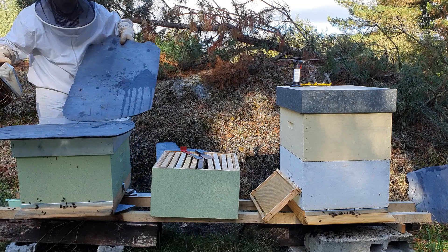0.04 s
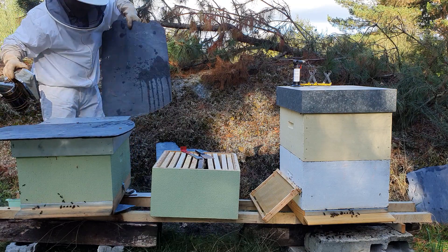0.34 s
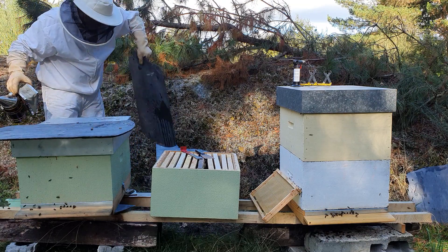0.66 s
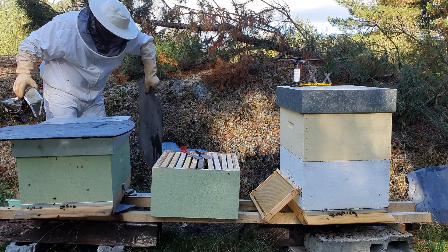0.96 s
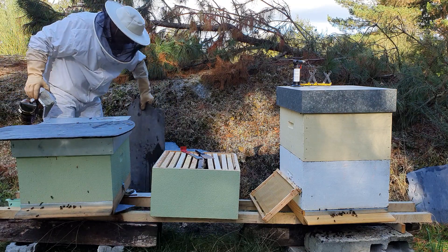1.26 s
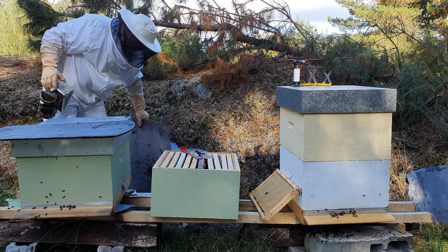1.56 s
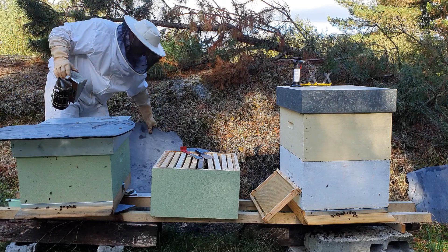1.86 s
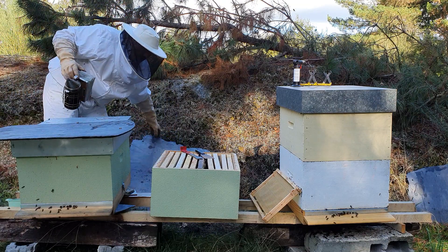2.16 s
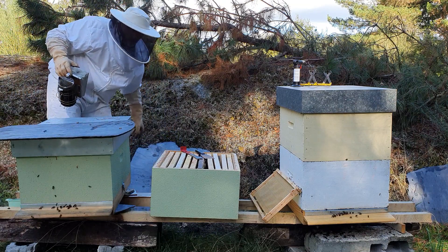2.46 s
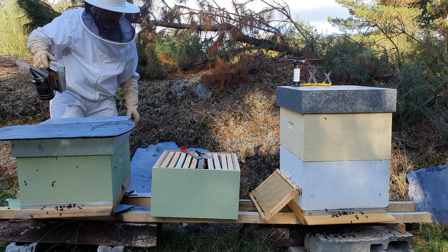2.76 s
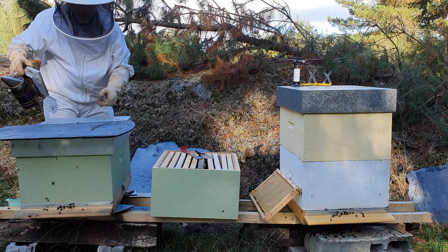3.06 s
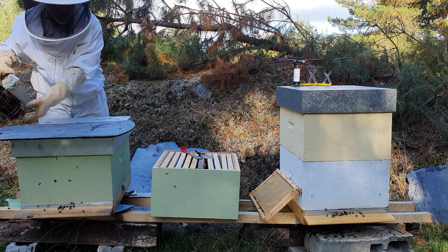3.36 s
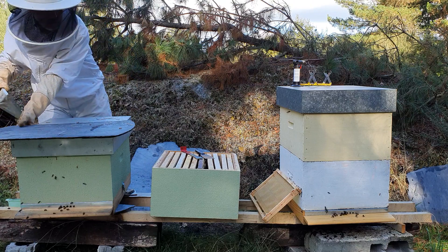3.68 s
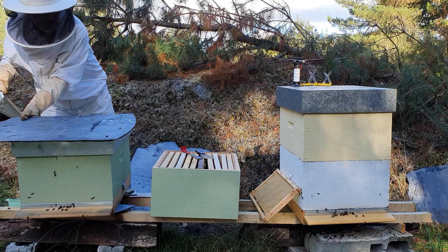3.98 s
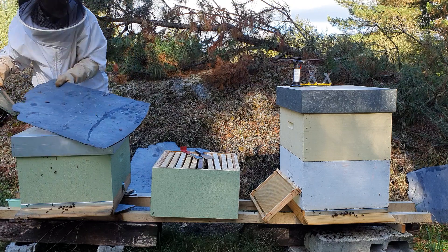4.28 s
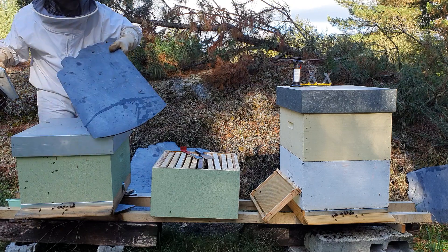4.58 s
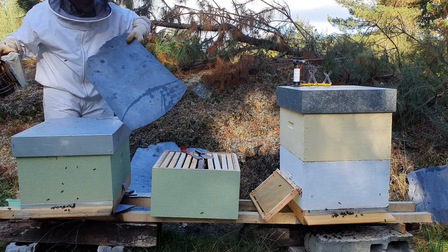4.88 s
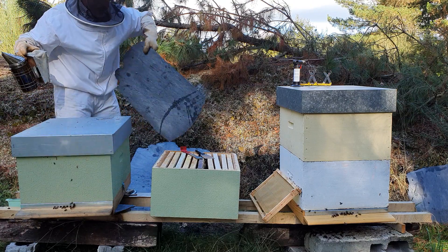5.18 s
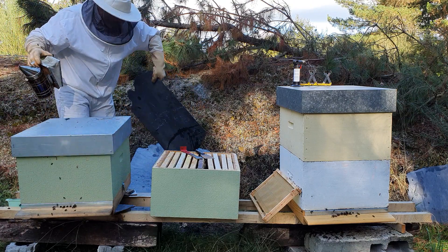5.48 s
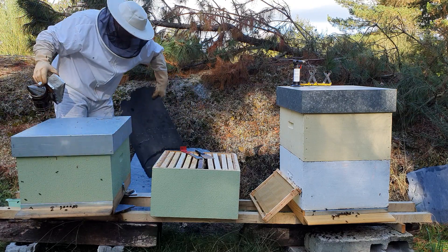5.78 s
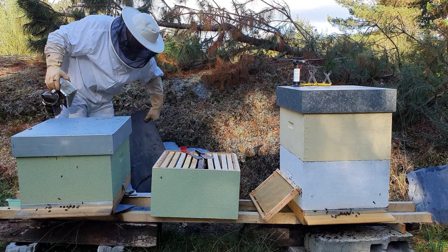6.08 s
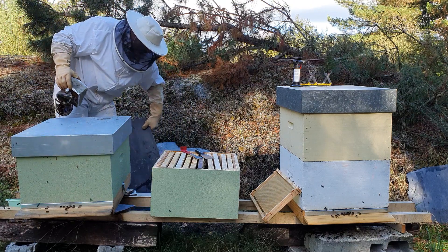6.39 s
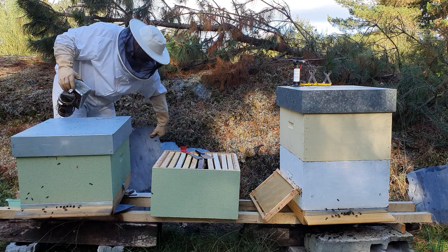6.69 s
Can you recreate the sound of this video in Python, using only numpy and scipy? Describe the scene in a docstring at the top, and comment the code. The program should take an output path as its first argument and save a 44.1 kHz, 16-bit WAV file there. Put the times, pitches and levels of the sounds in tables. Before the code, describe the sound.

Outdoors, a stiff cover sheet slides off a wooden hive roof with a scrape and a low whump. It is stood on the ground, then topples with a loud clatter. After a pause with soft scuffs of boots and clothing, a second sheet is dragged and bumped over the roof and set down with dull knocks. Faint honeybees, hissing leaves and a distant rumble continue behind. The handling sits slightly left in the stereo image.

```python
"""Two stiff cover sheets are taken off a wooden hive roof, outdoors, left of centre of a microphone pair.
The first slides off, is stood on the ground and topples with a clatter; the second is dragged and bumped
over the roof, then set on its edge. Knocks and tiny slips ring their bending modes; grit snaps and the
keeper's boots and suit scuff. Behind it all are the faint wingbeat hum of honeybees, hissing leaves and
a distant rumble. Trees and a bank return a faint, short echo."""
import sys
import numpy as np
from scipy import signal
from scipy.fft import rfft, irfft, next_fast_len
from scipy.io import wavfile
from scipy.ndimage import uniform_filter1d, map_coordinates

SR = 44100
rng = np.random.default_rng(int(sys.argv[2]) if len(sys.argv) > 2 else 0)


def pcm_store(signal):
    """Save signal as 16-bit PCM."""
    levels = np.round(np.clip(np.atleast_2d(signal), -1, 1) * 32767)
    wavfile.write(sys.argv[1], SR, levels.astype(np.int16).T)


N = 306045

# overtones of a wingbeat: pitch_hz, relative_db
WING_OVERTONES = [(225, -3), (460, 3.5), (700, -13.5), (1100, -16), (1500, -23), (2200, -37.5), (3500, -46)]
# the whole background sinks and comes back: time_s, gain_db
BACKGROUND_GAIN = [(0, 8.5), (0.801, -3), (2.1, 4), (2.699, -2.5), (3.3, -6), (3.7, -3), (4.2, 7.5),
                   (5.3, .5), (6.899, 1)]
# knocks: start_s, level_db, hardness_db (clack over body), favoured_hz (set by the contact point)
FIRST_KNOCKS = [(0.0, -23, -2.5, 610), (.047, -29.5, 3, 1170), (.113, -42, 5.5, 1190),
                (1.821, -24.5, -0.5, 856), (1.843, -27, -15, 252.2), (1.998, -39, -10.5, 530),
                (2.208, -40, -6.5, 219), (2.261, -26, -16.5, 220), (2.273, -15, -5, 742.4),
                (2.291, -9.5, -7, 450), (2.387, -26, -15, 443), (2.446, -21, -22, 620)]
ROOF_KNOCKS = [(4.021, -41, -5.5, 523), (4.043, -35, -16, 533), (4.095, -35.5, -14, 1220),
               (4.171, -27, -17, 540), (4.217, -31.5, -5.5, 1240), (4.329, -30, -3.5, 1790),
               (4.397, -34.5, -7, 1092), (4.447, -30.5, -7.5, 674), (4.523, -26.5, -13.5, 700),
               (4.559, -29, -0.5, 1000), (4.598, -24, -3.5, 1008), (4.638, -42, 10.5, 2180),
               (4.808, -25, 4.5, 2400), (4.883, -27, 2, 1240), (4.946, -19.5, -1.5, 583),
               (5.123, -60, 13, 1770)]  # second sheet on the roof
EDGE_KNOCKS = [(5.551, -53.5, -24, 480), (6.137, -25.5, -6.5, 174), (6.252, -35.5, -21, 670),
               (6.35, -49.5, -27, 730), (6.891, -31.5, -18, 477)]  # second sheet on its edge
# bending modes: pitch_hz, relative_db, base_t60_s (scaled for each blow)
FIRST_SHEET_MODES = [(64.3, -21.5, 0.15), (99.5, -8, 0.36), (162, -6.5, 0.16), (215.5, -0.5, 0.27),
                     (285.6, 4.5, 0.44), (336, -10, 0.78), (455.6, 1, 0.23), (517, 1.5, 0.091),
                     (616, -6, 0.18), (693, 0.5, 0.11), (867, 1.5, 0.11), (999, -10, 0.18),
                     (1190, -13.5, 0.19), (1490, -15.5, 0.11), (1694, -9.5, 0.12), (1890, -13.5, 0.071),
                     (2150, -17, 0.12), (2286, -21.5, 0.18), (2625, -14.5, 0.06), (3370, -18, 0.053),
                     (3780, -22.5, 0.048), (4120, -24, .05)]
ON_ROOF_MODES = [(78.7, -10.5, 0.26), (106, -15.5, 0.21), (157, -1, 0.19), (217.4, -8.5, 0.23),
                 (332.5, 4, 0.067), (416.8, 2.5, 0.16), (536, 5.5, 0.15), (696.7, 4, 0.15), (786, -2, 0.14),
                 (1013.8, -3.5, 0.18), (1092, 2, 0.043), (1247, -3.5, 0.12), (1533, -3, 0.1),
                 (1720, -1.5, 0.069), (1819.4, -9, 0.1), (2208, -8, 0.08), (2300, -7.5, 0.075),
                 (2780, -16, .06)]  # second sheet lying on the roof
ON_EDGE_MODES = [(90.6, -1, 0.203), (186.3, 3, 0.17), (243, -0.5, 0.24), (301.6, 2.5, 0.19),
                 (371, -3.5, 0.18), (469.2, -5.5, 0.4), (610, -18, 0.11), (737, 1, 0.13), (857, 2.5, 0.152),
                 (1110, -4.5, 0.1), (1228, -15, 0.1), (1305, 2.5, 0.058), (1522, -5, 0.12),
                 (1687, -26, 0.12), (1780, -15, 0.21), (2660, -24.5, 0.23)]  # second sheet on its edge
# rubbing strokes: start_s, length_s, force_db, swell_db
SLIDE_STROKES = [(.047, 0.09, -32, -21), (.128, .11, -33.5, -8), (.25, .235, -69.5, 5)]  # first sheet leaving the roof
FIRST_CREEP = [(1.83, 0.62, -55, -8.5)]  # its edge in the litter
CHATTER_STROKES = [(2.29, .165, -24.5, -5.5)]  # toppled, on the ground
DRAG_STROKES = [(3.93, 0.062, -50, 5), (4.02, 0.1, -33.5, -4.5), (4.22, 0.054, -42, -17),
                (4.335, 0.049, -27.5, -4.5), (4.447, .188, -26.5, 5.5)]  # second sheet crossing the roof
SECOND_CREEP = [(6.145, .07, -32.5, -8.5), (6.22, 0.123, -54, -19.5)]  # its edge in the litter
# boots and suit: peak_s, half_length_s, peak_db, centre_hz
KEEPER_SCUFFS = [(1.935, 0.077, -55, 1780), (1.997, .08, -51, 624), (2.807, .12, -59.5, 954),
                 (2.949, 0.1, -66, 377.6), (3.082, 0.12, -62.5, 870), (3.169, .05, -64.5, 384),
                 (5.63, 0.16, -65.5, 2460)]
# grit breaking under the sheet: start_s, level_db
GRIT_SNAPS = [(4.259, -51.5), (4.41, -47), (5.164, -54.5), (5.194, -51)]
# noise colours: frequency_hz, relative_density_db
RUMBLE_SPECTRUM = [(25, -18), (45, -8.5), (68, 0), (100, -7), (135, -10.5), (300, -8.5), (600, -14),
                   (1100, -13), (1600, -18), (2300, -36.5), (4000, -87)]  # far-off background
LEAF_SPECTRUM = [(900, -21), (1500, -0.5), (2000, 1), (2800, -4), (4800, -0.5), (6500, 7), (7800, -3),
                 (9300, 0.5), (11000, -7), (16000, -8)]  # the trees
CLATTER_SPECTRUM = [(25, -31), (75, -12), (200, -6), (600, 10.5), (1200, -5.5), (2200, -6), (4000, -24.5),
                    (6200, -27.5), (7600, -37.5), (10000, -35.5), (16000, -47)]  # sheet against wood
SLIDE_SPECTRUM = [(200, -4.5), (400, -12.5), (900, -3.5), (1500, -0.5), (2300, 3.5), (3300, -3),
                  (4500, -0.5), (6300, 4.5), (7600, -7.5), (9500, 0.5), (12000, -6), (16000, -6.5)]  # a sliding edge
FLEX_SPECTRUM = [(25, -21), (75, 0.5), (120, -4), (170, 11), (260, -23), (600, -58)]  # a bending sheet
GRIT_SPECTRUM = [(1200, -28.5), (2500, -3.5), (4000, 4), (4700, -5), (5600, 6), (7500, -11.5), (9500, -6),
                 (12000, -13.5), (16000, -8)]  # grit on roof and ground
CRUNCH_SPECTRUM = [(400, -24.5), (1000, 1.5), (2200, -3.5), (3000, 0), (4000, -5.5), (5500, -15.5),
                   (8000, -34), (16000, -43)]  # ground under the toppled sheet
# time to fade by 60 dB: frequency_hz, t60_s
CLATTER_DECAY = [(80, 0.5), (500, 0.23), (2000, 0.25), (6000, .13), (15000, 0.12)]
ECHO_DECAY = [(100, 0.94), (500, 0.43), (2500, 0.79), (6000, 0.72), (14000, 0.44)]
# how alike the two microphones hear: frequency_hz, likeness (0 to 1)
MIC_LIKENESS = [(100, 0.97), (300, 0.99), (550, 0.91), (1000, 0.6), (2000, 0.24), (5000, 0.33), (12000, 0)]
# left microphone against right: frequency_hz, difference_db
MIC_COLOUR = [(100, 0), (500, -1), (4000, -4), (9000, 1.5), (14000, 4.5)]


def amp(db):
    """Decibels to gain."""
    return 10 ** (np.asarray(db) / 20)


def unit(x):
    """Scale to rms 1."""
    return x / np.sqrt(np.mean(x ** 2) + 1e-20)


def along(points, hz):
    """Read (frequency_hz, value) points on a log axis."""
    frequencies, values = np.transpose(points)
    return np.interp(np.log(hz + 1), np.log(frequencies + 1), values)


def wobble(knots_per_s):
    """A smooth random curve."""
    knots = rng.standard_normal(2048)
    coarse = np.arange(0, N + 256, 256)
    curve = map_coordinates(knots, [coarse * knots_per_s / SR], mode="wrap")
    return np.interp(np.arange(N), coarse, curve)


def filtered(x, response):
    """Apply a frequency response."""
    size = x.shape[-1]
    padded = next_fast_len(size + 8192)
    return irfft(rfft(x, padded) * response(np.fft.rfftfreq(padded, 1 / SR)), padded)[..., :size]


def spread(hz):
    """Stereo angle in radians: the microphones share the bass but little of the treble."""
    return np.arccos(np.clip(along(MIC_LIKENESS, hz), -1, 1)) / 2


def noise(spectrum, size=N):
    """Coloured stereo noise of rms 1."""
    def colour(hz):
        return amp(along(spectrum, hz)) * [np.cos(spread(hz)), np.sin(spread(hz))]
    mid, side = filtered(rng.standard_normal((2, size)), colour)
    return unit(np.array([mid + side, mid - side]))


def dying(x, decay):
    """Each frequency fades at its own speed."""
    hz, t, spectra = signal.stft(x, SR, nperseg=256)
    fade = amp(-60 * t / along(decay, hz)[:, None])
    return signal.istft(spectra * fade, SR, nperseg=256)[1][:, :x.shape[1]]


def onset_rms(x):
    """Strength of a blow's first 15 ms."""
    return np.sqrt(np.mean(x[:, :660] ** 2)) + 1e-12


def bees(count=11, wing_hz=239, swell_db=5.0, level_db=-66.5):
    """Each bee beats its wings at its own drifting, fluttering rate and swells as it flies nearer."""
    swarm = np.zeros((2, N))
    cycle = np.arange(1024) / 1024
    harmonic = np.arange(1, 14)[:, None]
    for offset in np.linspace(-1, 1, count):
        own_hz = wing_hz * (1 + .085 * offset)
        turns = np.cumsum(own_hz * (1 + .035 * wobble(3) + .011 * wobble(30))) / SR
        phase = 2 * np.pi * harmonic * cycle + rng.uniform(0, 2 * np.pi, harmonic.shape)
        bearing = spread(harmonic * own_hz) * rng.normal(size=harmonic.shape)
        gains = amp(along(WING_OVERTONES, harmonic * own_hz))
        beat = np.array([np.sum(gains * np.sin(phase + mic * bearing), axis=0) for mic in (1, -1)])
        swarm += amp(swell_db * wobble(3.5)) * beat[:, (turns * len(cycle)).astype(int) % len(cycle)]
    return amp(level_db) * unit(swarm)


def air(rumble_db=-64.5, leaves_db=-71):
    """Distant low rumble and a thin hiss from the trees."""
    rumble = amp(rumble_db + 0.2 * wobble(5.3)) * noise(RUMBLE_SPECTRUM)
    return rumble + amp(leaves_db + .5 * wobble(6.5)) * noise(LEAF_SPECTRUM)


def struck(modes, ring_scale, favoured_hz, clatter_db, crack_db, attack_s, favour_db=8):
    """One blow: bending modes, lifted near favoured_hz, over dense clatter and a brief crack."""
    t = np.arange(SR // 2) / SR
    ring = np.zeros((2, len(t)))
    for hz, db, t60 in modes:
        phase = rng.uniform(0, 2 * np.pi) + spread(hz) * rng.normal() * np.array([[1], [-1]])
        db = db + rng.normal() + favour_db * np.exp(-(np.log2(hz / favoured_hz) / .2) ** 2)
        life_s = t60 * max(ring_scale, .2)
        age = t[t < life_s]
        ring[:, :len(age)] += amp(db - 60 * age / life_s) * np.sin(2 * np.pi * hz * age + phase)
    blow = ring / onset_rms(ring)
    short = SR // 6
    rough = noise(CLATTER_SPECTRUM, short)
    clatter = dying(rough, CLATTER_DECAY)
    crack = rough * np.exp(-t[:short] / 0.0045)
    blow[:, :short] += amp(clatter_db) * clatter / onset_rms(clatter)
    blow[:, :short] += amp(crack_db) * crack / onset_rms(crack)
    return blow * (1 - np.exp(-t / attack_s))


def knocks(hits, modes, attack_s, ring_scale, choke, thud_db, thud_growth, tick_db, bright_hz, bend):
    """Strength sets body and thud and chokes the ring; hardness sets clack and tick."""
    bands_hz = [(140, 1200), (40, 130), (1200, 4000), (4000, 17000)]  # body, thud, clack, tick
    filters = [signal.butter(3, band, "band", fs=SR, output="sos") for band in bands_hz]
    out = np.zeros((2, N + SR))
    for start_s, db, hard_db, favoured_hz in hits:
        excess_db = db + 30  # over a medium blow
        # each contact bends the sheet and shifts its modes
        bent = [(hz * np.exp(bend * rng.normal()), level, t60) for hz, level, t60 in modes]
        choked = ring_scale * amp(-choke * excess_db)
        blow = struck(bent, choked, favoured_hz, clatter_db=-15, crack_db=-14, attack_s=attack_s)
        levels_db = [db, thud_db + thud_growth * excess_db, db + hard_db, db + hard_db + tick_db]
        start = round(start_s * SR)
        for sos, band_db in zip(filters, levels_db):
            part = signal.sosfilt(sos, blow + 1e-12)
            out[:, start:start + part.shape[1]] += amp(band_db) * part / onset_rms(part)
    # a soft surface dulls the top
    return filtered(out[:, :N], lambda hz: 1 / np.sqrt(1 + (hz / bright_hz) ** 6))


def strokes(rows, bite_s=0.0098, release_db_per_s=1198.5):
    """Rubbing force: a quick bite, an even swell or fade, a quick release."""
    t = np.arange(N) / SR
    force = np.zeros(N)
    for start_s, length_s, db, swell_db in rows:
        age = np.maximum(t - start_s, 0)
        held_db = db + swell_db * np.minimum(age / length_s, 1)
        release_db = release_db_per_s * np.clip(age - length_s, 0, 1)
        force += amp(held_db - release_db) * (1 - np.exp(-age / bite_s))
    return force


def shaken(force, modes, ring_scale, favoured_hz):
    """A sheet's middle modes answer a running force."""
    sheet = struck(modes, ring_scale, favoured_hz, clatter_db=-16, crack_db=-16, attack_s=.001)
    sheet = signal.sosfilt(signal.butter(2, (260, 5000), "band", fs=SR, output="sos"), sheet + 1e-12)
    return signal.fftconvolve(force[None], sheet / np.linalg.norm(sheet[0]), axes=1)[:, :N]


def slide(rough_db=0.5, sing_db=-2, flex_db=-13):
    """The first sheet's edge hisses off the roof and keeps the sheet singing and rumbling."""
    force = strokes(SLIDE_STROKES)
    hiss = force * amp(rough_db * wobble(150)) * noise(SLIDE_SPECTRUM)
    singing = shaken(hiss[0], FIRST_SHEET_MODES, ring_scale=1.0, favoured_hz=1220)
    return hiss + amp(sing_db) * singing + amp(flex_db) * force * noise(FLEX_SPECTRUM)


def flop(start_s=0.0477, pitch_hz=78, level_db=-22, rise_s=0.011):
    """The first sheet buckles once with a low whump as it comes free."""
    age = np.maximum(np.arange(N) / SR - start_s, 0)
    swell = (age / rise_s * np.exp(1 - age / rise_s)) ** 2
    return amp(level_db) * swell * np.sin(2 * np.pi * pitch_hz * age)


def rubbing(rows, modes, spectrum, slips_per_s, gentle_hz, hard_hz, ring_db, grit_db, flex_db):
    """Tiny slips shake the sheet and spurt grit; force shifts the singing from gentle_hz to hard_hz."""
    force = strokes(rows)
    effort = force / force.max()
    slips = unit((rng.random(N) < slips_per_s / SR) * rng.standard_normal(N))
    slips = force * unit(slips * amp(3 * wobble(60)))  # the edge catches and lets go
    spurts = uniform_filter1d(np.abs(slips) / (force + 1e-12), size=150)
    gentle = shaken(slips * np.sqrt(1 - effort), modes, ring_scale=0.77, favoured_hz=gentle_hz)
    hard = shaken(slips * np.sqrt(effort), modes, ring_scale=0.77, favoured_hz=hard_hz)
    grit = amp(grit_db) * unit(1 + unit(spurts)) * noise(spectrum)
    flex = amp(flex_db) * noise(FLEX_SPECTRUM)
    return amp(ring_db) * (gentle + hard) + force * (grit + flex)


def first_sheet(flat_s=2.47, hush_db_per_s=190):
    """It slides off, is stood in the litter, creeps, topples and chatters until the ground damps it."""
    sheet = knocks(FIRST_KNOCKS, FIRST_SHEET_MODES, attack_s=0.00032, ring_scale=0.87, choke=0.14,
                   thud_db=-46.5, thud_growth=0.44, tick_db=-12, bright_hz=7300, bend=0.0046)
    sheet += rubbing(FIRST_CREEP, FIRST_SHEET_MODES, GRIT_SPECTRUM, slips_per_s=310,
                     gentle_hz=860, hard_hz=530, ring_db=2, grit_db=-16.5, flex_db=-5)
    sheet += rubbing(CHATTER_STROKES, FIRST_SHEET_MODES, CRUNCH_SPECTRUM, slips_per_s=500,
                     gentle_hz=438.7, hard_hz=636, ring_db=2.5, grit_db=-29.5, flex_db=-19)
    damping = amp(-hush_db_per_s * np.maximum(np.arange(N) / SR - flat_s, 0))
    return sheet * damping + slide() + flop()


def scuffs(skirt_db=-17):
    """Boots and suit rub in soft swells as the keeper moves."""
    out = np.zeros((2, N + SR))
    for peak_s, half_length_s, db, hz in KEEPER_SCUFFS:
        size = int(2 * half_length_s * SR)
        start = int((peak_s - half_length_s) * SR)
        band = [(hz / 8, skirt_db), (hz / 2, 0), (hz * 1.4, -2),
                (hz * 3, skirt_db), (hz * 8, 2 * skirt_db)]
        out[:, start:start + size] += amp(db) * np.hanning(size) ** 2 * noise(band, size)
    return out[:, :N]


def second_sheet():
    """It is dragged and bumped over the roof, then stood on its edge, where it creeps."""
    sheet = knocks(ROOF_KNOCKS, ON_ROOF_MODES, attack_s=0.0021, ring_scale=0.86, choke=0.031,
                   thud_db=-45.0, thud_growth=0.58, tick_db=-9.5, bright_hz=17940, bend=0.022)
    sheet += rubbing(DRAG_STROKES, ON_ROOF_MODES, GRIT_SPECTRUM, slips_per_s=210,
                     gentle_hz=543, hard_hz=1060, ring_db=-1.5, grit_db=-29.5, flex_db=-21)
    sheet += knocks(EDGE_KNOCKS, ON_EDGE_MODES, attack_s=0.0029, ring_scale=0.57, choke=0.032,
                    thud_db=-47.5, thud_growth=1.8, tick_db=-13.5, bright_hz=9000, bend=.01)
    return sheet + rubbing(SECOND_CREEP, ON_EDGE_MODES, GRIT_SPECTRUM, slips_per_s=500,
                           gentle_hz=300, hard_hz=830, ring_db=7.5, grit_db=-28.5, flex_db=-4)


def snaps(decay_s=.004):
    """Each bit of grit breaks with one short dry tick."""
    out = np.zeros((2, N))
    size = SR // 20
    fade = np.exp(-np.arange(size) / SR / decay_s)
    for start_s, db in GRIT_SNAPS:
        start = round(start_s * SR)
        out[:, start:start + size] += amp(db) * fade * noise(GRIT_SPECTRUM, size)
    return out


def echo(x, rise_s=0.0025):
    """Trees and the bank scatter back a tail in which the ringing pitches are blurred."""
    colour = [(60, -10), (400, -0.5), (1200, -9), (3500, 4.5), (6000, -1), (9000, -5.5), (14000, -3.5)]
    tail = dying(noise(colour, SR), ECHO_DECAY)
    tail *= 1 - np.exp(-np.arange(SR) / SR / rise_s)
    wet = signal.fftconvolve(x.mean(axis=0)[None], tail / np.linalg.norm(tail[0]), axes=1)[:, :N]
    blur = np.exp(2j * wobble(200))
    return np.real(signal.hilbert(wet, next_fast_len(N))[:, :N] * blur)


def scene(lead_s=.0001):
    """The keeper works in the apiary's hum; direct sound reaches the left microphone first."""
    handling = first_sheet() + second_sheet() + snaps() + scuffs()
    background_db = np.interp(np.arange(N) / SR, *np.transpose(BACKGROUND_GAIN))
    apiary = amp(background_db) * (bees() + air())
    advance_s = lead_s * np.array([[.5], [-.5]])
    direct = filtered(handling + apiary, lambda hz: np.exp(2j * np.pi * hz * advance_s))
    return direct + amp(-21.5) * echo(handling)


def record(dry, top_hz=16100):
    """The two microphones differ a little in colour; nothing above top_hz is kept."""
    return filtered(dry, lambda hz: amp(along(MIC_COLOUR, hz) * np.array([[.5], [-.5]])) * (hz < top_hz))


dry = scene()
out = record(dry)
pcm_store(out)
```